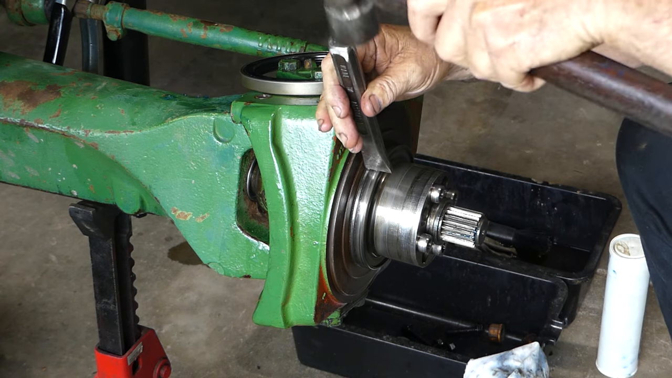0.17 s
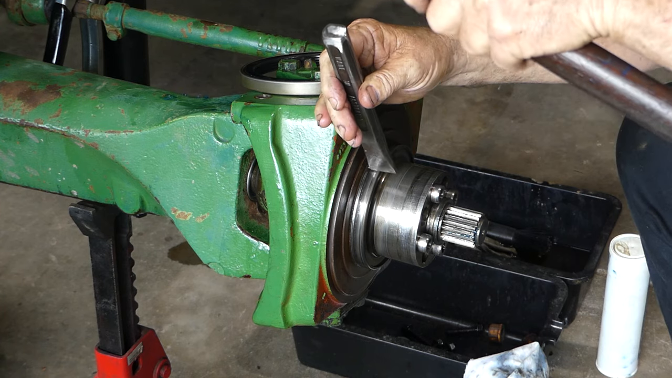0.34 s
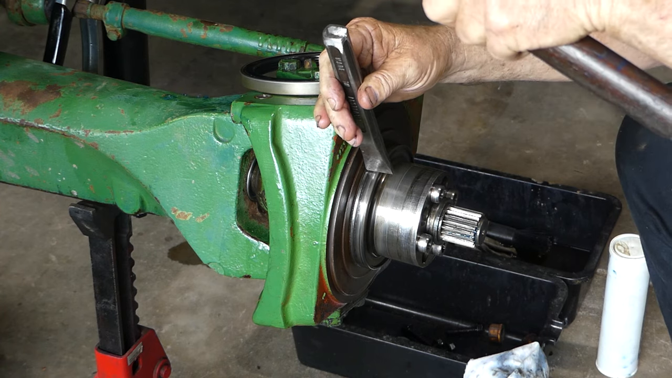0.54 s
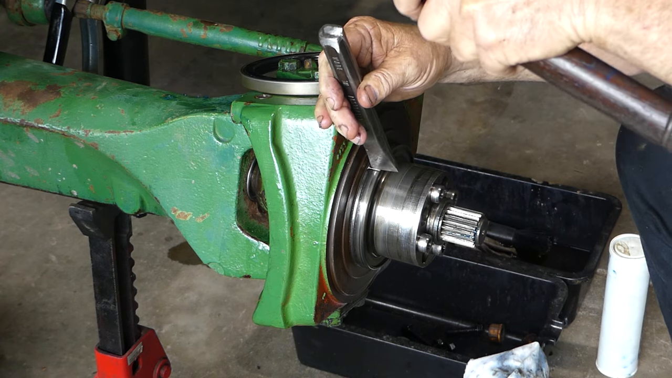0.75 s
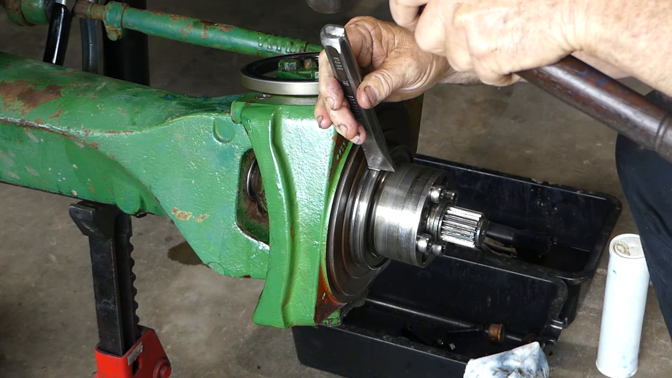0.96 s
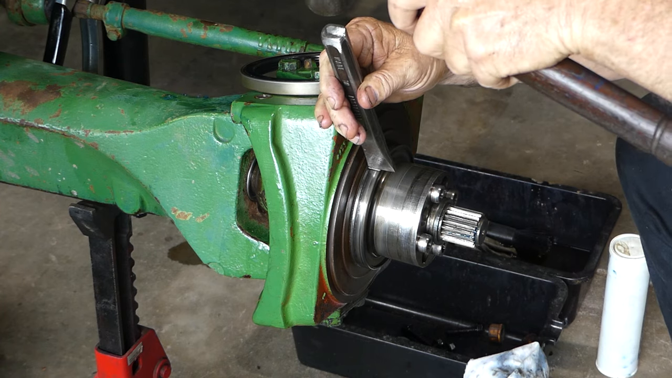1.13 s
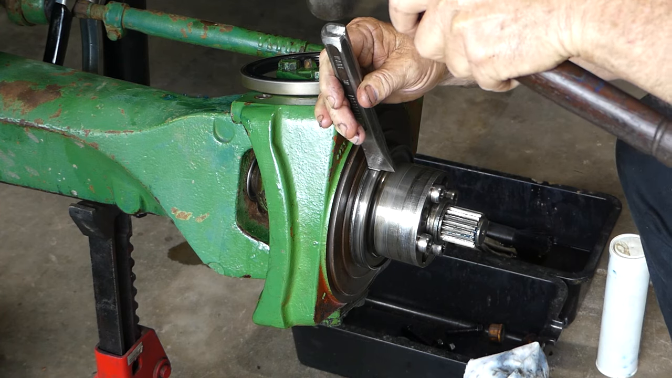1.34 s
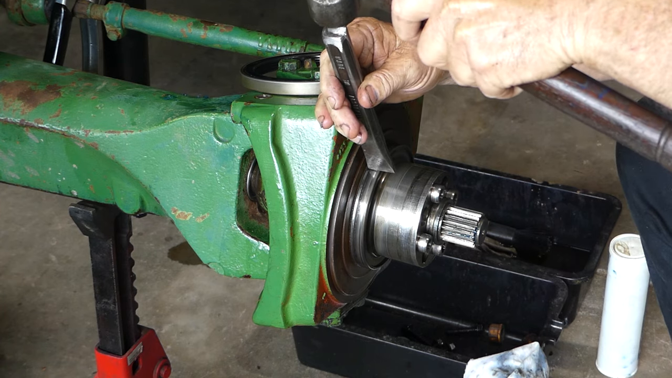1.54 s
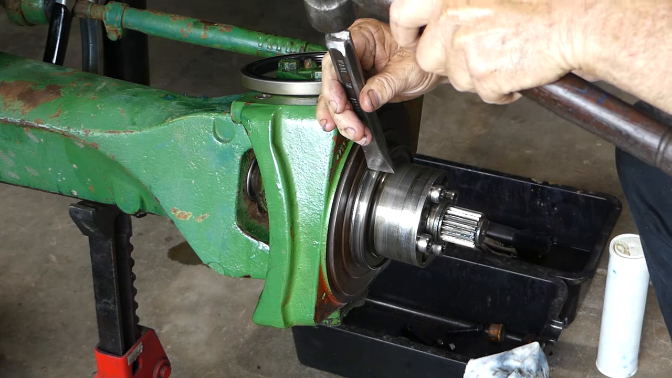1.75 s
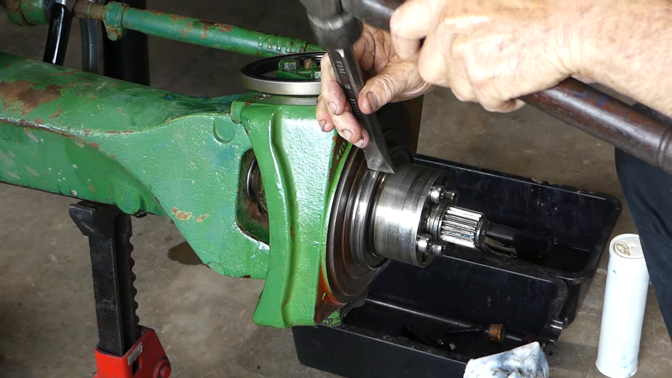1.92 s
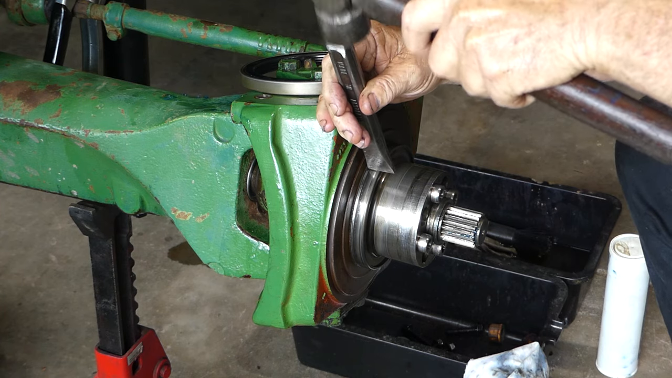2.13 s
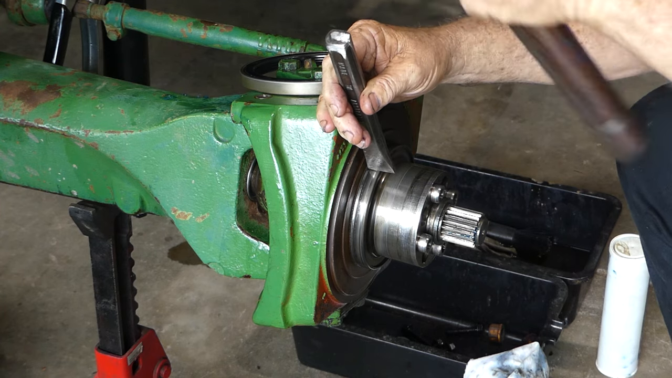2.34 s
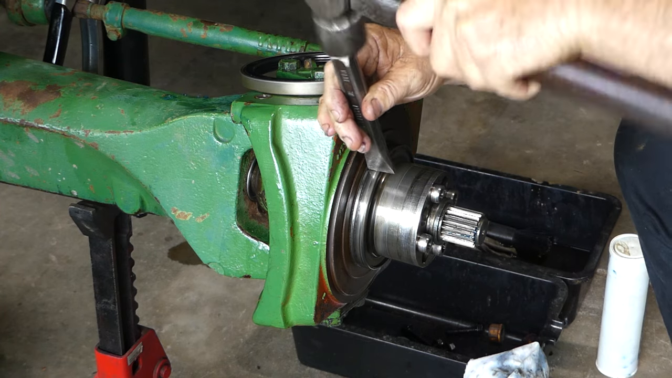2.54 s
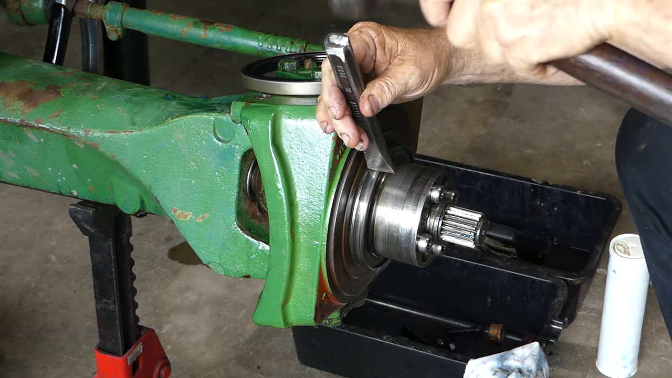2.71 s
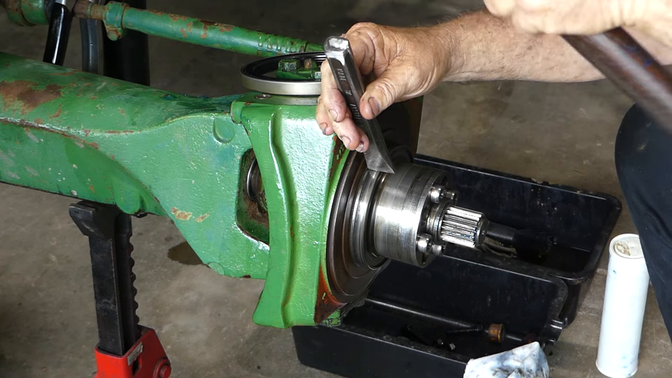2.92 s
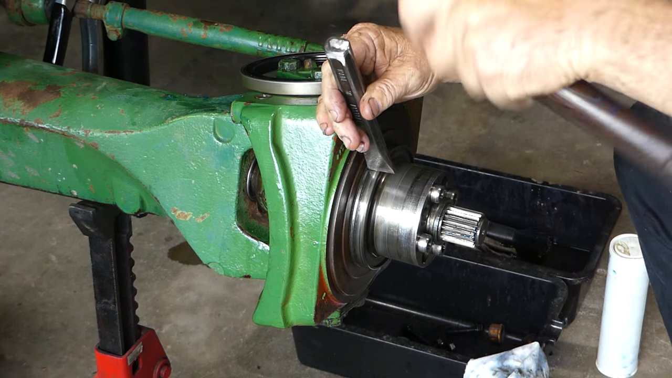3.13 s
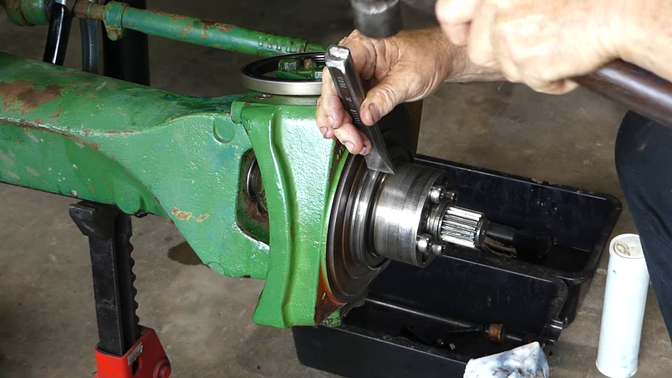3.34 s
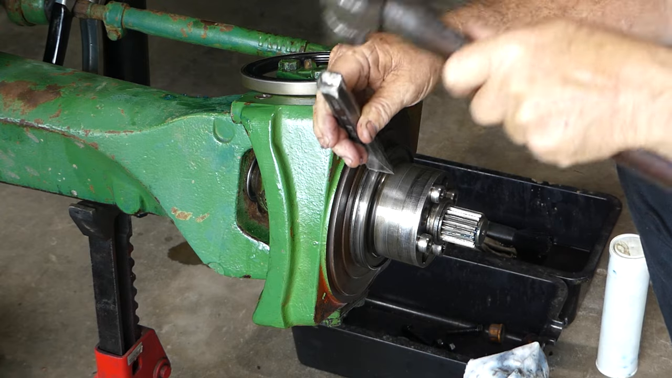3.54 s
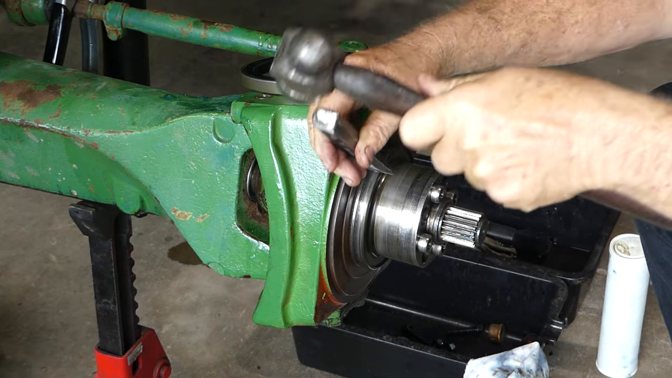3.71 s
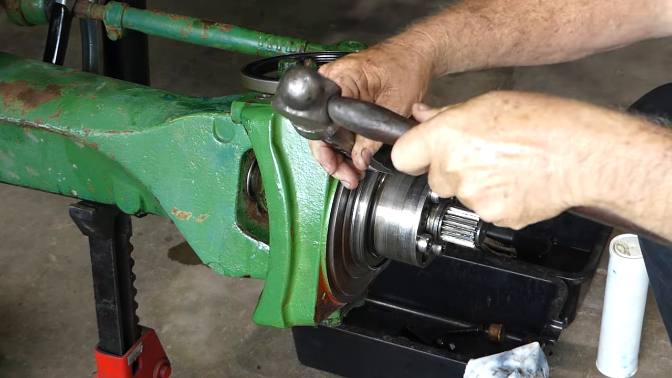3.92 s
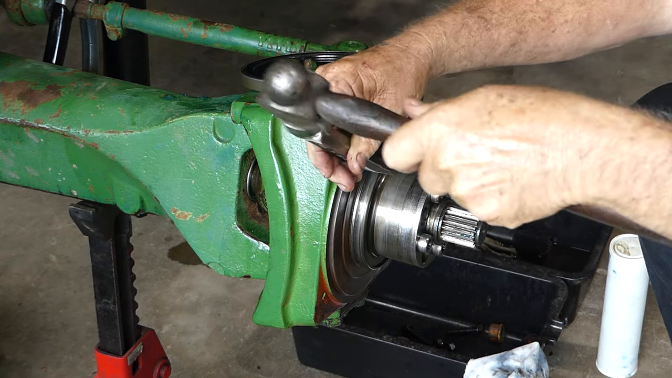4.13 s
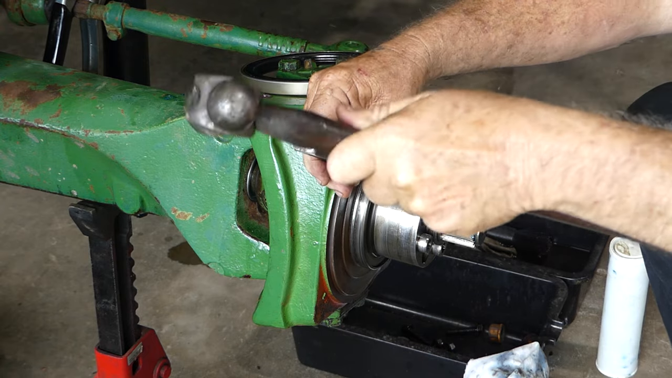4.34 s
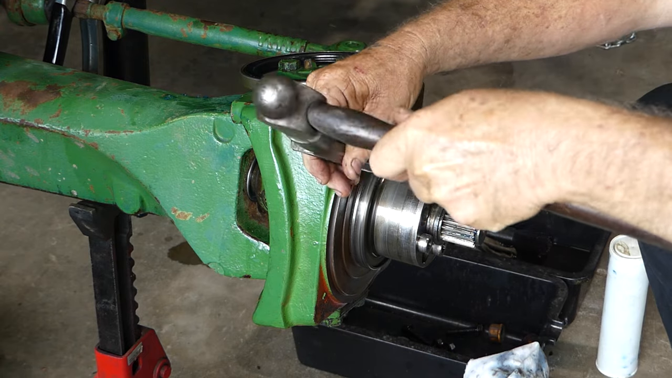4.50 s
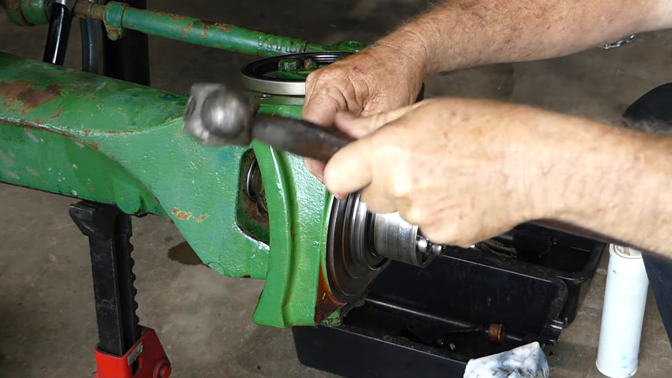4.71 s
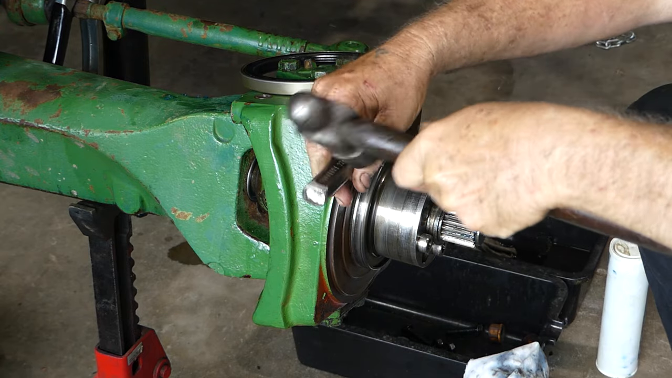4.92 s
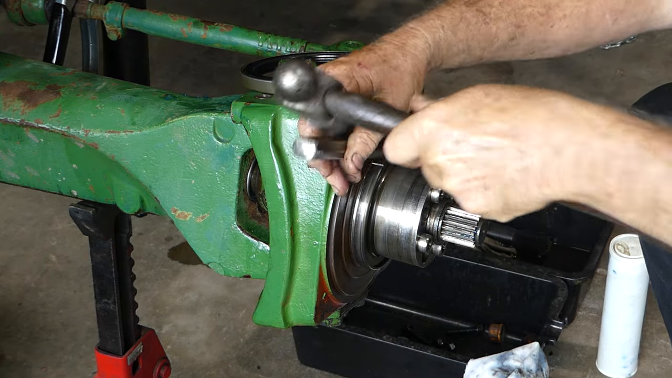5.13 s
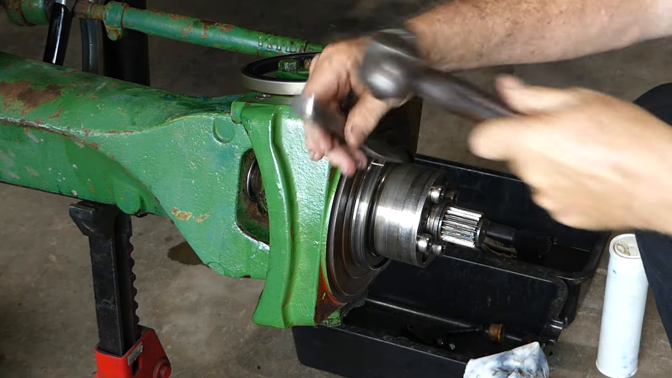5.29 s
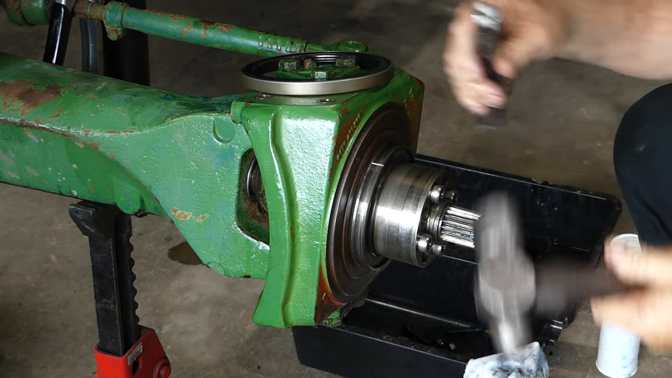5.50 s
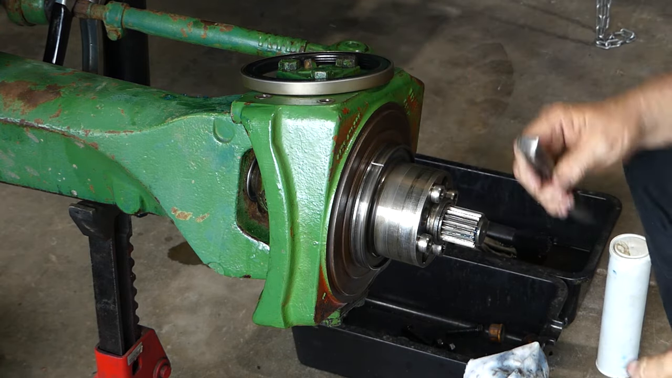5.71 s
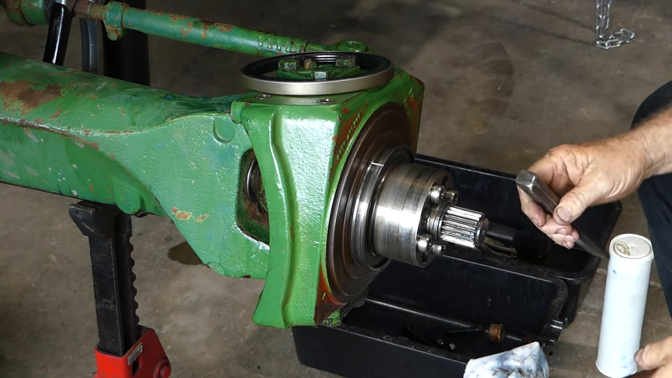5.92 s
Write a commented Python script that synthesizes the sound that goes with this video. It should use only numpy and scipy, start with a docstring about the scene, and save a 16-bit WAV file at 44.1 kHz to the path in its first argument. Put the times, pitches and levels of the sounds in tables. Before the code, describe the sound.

A hammer strikes a chisel against a heavy steel hub in sharp, ringing blows, with pauses and light taps, in a workshop.

```python
"""In a workshop, heard from one microphone position, a hammer drives a chisel against a cast axle's hub.
The first blow cracks, sets casting and room ringing and overloads the microphone; light taps then place
the hammer. Six more blows follow, weak and strong, the last three on the side of the hub, while the
hand-held chisel rings and chatters on its seat. At the end come a small click as the tools are lifted
and a faint swish of cloth as the arms draw back."""
import sys
import numpy as np
from scipy import signal
from scipy.fft import rfft, irfft
from scipy.io import wavfile
from scipy.ndimage import uniform_filter1d

SR = 44100
rng = np.random.default_rng(int(sys.argv[2]) if len(sys.argv) > 2 else 0)


def dump_mix(stems):
    """Bounce the given channels to the path in sys.argv[1] as a 16-bit WAV at rate SR."""
    frames = np.atleast_2d(stems).T  # one column per channel
    limited = np.clip(frames, -1, 1)  # hard clip at full scale
    pcm = np.round(limited * 32767).astype(np.int16)
    wavfile.write(sys.argv[1], SR, pcm)


N = 262647
TIME = np.arange(N) / SR
RING_SIZE = 81920
AGE, BINS = np.arange(RING_SIZE) / SR, np.fft.rfftfreq(RING_SIZE, 1 / SR)
# hammer blows: (time [s], force [dB], brightness [dB/octave], pitch the struck spot favours [Hz],
# chisel ring [dB], edgewise over flat bending [dB], pitch rise from the seat [Hz])
HAMMER_BLOWS = [(0.0238, -1.34, 1, 6370, -3, -11, 68), (2.0127, -20.5, -1.1, 3400, -4.5, -8.5, 340),
                (2.5871, 0, 0, 3480, -7.5, -1, 124), (3.208, -0.96, -0.52, 1590, -19.5, -12, 100),
                (3.9591, -19, -1.84, 2300, -15, -2, 370), (4.4716, -5.5, 0.42, 560, -12.5, 3.5, 560),
                (4.9207, -7.5, 0.1, 2640, 0, -3.5, 13)]


def clang(crack_t60=0.059, build_s=0.0013):
    """Countless close modes of casting and room: each blow gives a short crack, then a diffuse tail."""
    # dense ring of casting and room: (frequency [Hz], density [dB/Hz])
    body = [(25, -76.5), (55, -54), (85, -50.5), (280, -49), (550, -48.5), (1000, -50), (1650, -55.5),
            (1950, -55.5), (3300, -58), (4050, -58.5), (5200, -60), (7300, -62), (9000, -72), (12000, -79),
            (15000, -69.5)]
    # clusters of close modes in the hub: (centre [Hz], width [Hz], lift [dB])
    clusters = [(1680, 89, 4), (2300, 1100, 2), (3295, 370, 5), (3610, 300, 4), (4610, 90, 9),
                (5280, 37, 7.5), (5960, 250, 7.5), (9300, 200, 2.5)]
    # colour of the crack against the tail: (frequency [Hz], gain [dB])
    crack_colour = [(100, -4.5), (500, 3.5), (1200, 5), (2500, 8.5), (6000, 13.5), (14000, 9)]
    out = np.zeros(N)
    cluster_db = sum(db / (1 + (2 * (BINS - hz) / width) ** 2) for hz, width, db in clusters)
    body_db = at_hz(body, BINS) + cluster_db
    for blow in HAMMER_BLOWS:
        s, force_db = blow[:2]
        density_db = body_db + blow_level(blow, BINS)
        crack_db = 8 - 0.39 * force_db   # the crack stands out more in weak blows
        crack = irfft(noise_bins(density_db + at_hz(crack_colour, BINS) + crack_db))
        add(out, s, crack * fade(AGE, crack_t60) + room_tail(density_db, build_s))
    return out


def axle(gain_db=3, swell_s=0.00098, scatter_db=1.5):
    """The clear modes of the casting; every blow shares its force out a little differently."""
    # axle modes: (frequency [Hz], level [dB], t60 [s])
    modes = [(124, -39, .9), (278, -35, .9), (329, -41, 3.2), (338, -25, .7), (390, -33, .8),
             (453, -25, .9), (537, -27, .95), (614, -29, .5), (645, -26, .45), (682, -32, .8),
             (764, -28, .85), (872, -28, .95), (957, -37, 1.3), (1067, -37, 1.1), (1109, -30, 1.1),
             (1256, -33, .9), (1313, -30, .7), (1476, -30, .8), (1582, -21, .25), (1602, -28, .6),
             (1775, -28, .7), (2654, -30, .2), (3257, -31, .5), (3703, -32, .45)]
    out = np.zeros(N)
    for hz, level_db, t60 in modes:
        mode = ring(hz, t60)
        mode *= 1 - np.exp(-TIME[:len(mode)] / swell_s)   # the blow takes time to spread through the iron
        for blow in HAMMER_BLOWS:
            mode_db = gain_db + level_db + blow_level(blow, hz) + rng.normal(0, scatter_db)
            add(out, blow[0], mode * from_db(mode_db))
    return out


def blow_level(blow, hz, move_s=3.7, pivot_hz=2150, spot_lift_db=3.5, spot_octaves=0.17):
    """Level of a blow at a frequency: its force, the spot struck and a tilt from the contact time."""
    # the casting's answer on top of the hub, before move_s: (frequency [Hz], gain [dB])
    top_of_hub = [(50, 1), (300, 2), (1000, -1), (1600, 0), (2800, -3.5), (4800, 1), (7000, -1), (12000, 0)]
    # its answer at the side of the hub, afterwards: (frequency [Hz], gain [dB])
    side_of_hub = [(50, 1.5), (300, -1.5), (1000, -3.5), (2500, 3.5), (5000, -1.5), (12000, 3)]
    s, force_db, brightness, spot_hz = blow[:4]
    hz_above_bass = np.maximum(hz, 280)   # the tilt levels off in the bass
    tilt_db = brightness * np.log2(hz_above_bass / pivot_hz)
    spot_db = spot_lift_db * np.exp(-(np.log2(hz_above_bass / spot_hz) / spot_octaves) ** 2)
    return force_db + at_hz(top_of_hub if s < move_s else side_of_hub, hz) + tilt_db + spot_db


def chisel(seated_share=0.25, seat_damping_hz=43.7, choke_t60=0.12, tick_t60=0.019):
    """A steel bar ticks and rings; pressed on its seat, it bends at a higher pitch and stops sooner."""
    # chisel modes: (way of vibrating, frequency [Hz], level [dB], t60 [s])
    modes = [("flat", 2293, -1, .15), ("flat", 5832, 0, .13), ("flat", 10195, -12, .14),
             ("edge", 2937, 0, .17), ("edge", 7418, 0, .11), ("edge", 13360, -20, .12),
             ("length", 7924, -1, .25), ("length", 14135, -6, .2), ("length", 14915, -14, .12)]
    out, lowest_hz = np.zeros(N), modes[0][1]
    tick_band = signal.butter(2, [900, 6000], "band", fs=SR, output="sos")
    touches = sorted(contacts())
    next_times = [touch[0] for touch in touches[1:]] + [N / SR]
    for touch, next_s in zip(touches, next_times):
        s, ring_db, edgewise_db, lengthwise_db, hardness, tick_db, seat_hz = touch
        slant = np.arctan(from_db(edgewise_db))
        drive = {"flat": np.cos(slant), "edge": np.sin(slant), "length": from_db(lengthwise_db)}
        ring_share = seated_share + (1 - seated_share) * np.exp(-abs(seat_hz) / seat_damping_hz)
        for way, hz, level_db, t60 in modes:
            overtone_db = hardness * np.log2(hz / lowest_hz)   # hard contacts favour the overtones
            gain = drive[way] * from_db(ring_db + level_db + overtone_db)
            seat_feel = .75 if way == "length" else 1   # the seat damps lengthwise ring less than bending
            mode = ring(hz, t60 * ring_share ** seat_feel, seat_hz * (way == "flat"))
            since_next = np.maximum(TIME[:len(mode)] - (next_s - s), 0)
            choke = fade(since_next, choke_t60)   # the next contact stops what still rings
            add(out, s, gain * mode * choke * chatter(len(mode), seat_hz))
        tick = signal.sosfilt(tick_band, rng.standard_normal(RING_SIZE // 10))
        add(out, s, 2 * from_db(tick_db) * tick * fade(AGE[:len(tick)], tick_t60))
    return out


def contacts(blow_lengthwise_db=-13.5, tap_lengthwise_db=-15, tap_tick_db=-17):
    """Every blow and light tap, with the way it excites the chisel."""
    # the hammer settles on the chisel, or the chisel bounces on its seat: (time [s], ring [dB],
    # edgewise over flat bending [dB], hardness [dB/octave], pitch rise from the seat [Hz])
    taps = [(0.048, -2.5, -14, 0, 103), (0.4874, -33.5, -13, -13, 49), (0.801, -41.5, -16.5, -7.5, 50),
            (1.4342, -17.5, -28.5, -7.5, 55), (2.615, -13, -7.5, -1.5, 83), (3.2513, -11, -24, -4, 62),
            (4.946, -14, 6, 4, 2), (4.9799, -12.5, 8, 0.5, 6), (5.0038, -8.5, -27, -6, 9),
            (5.013, -14, -9, -1.5, 30), (5.0865, -15, -2, -4, 86)]
    for s, force_db, _, _, ring_db, edgewise_db, seat_hz in HAMMER_BLOWS:
        hardness = 3.5 + 0.36 * force_db   # stronger contacts are shorter, so brighter
        tick_db = -22 - 0.0012 * seat_hz   # slightly softer on a firm seat
        yield s, ring_db, edgewise_db, blow_lengthwise_db, hardness, tick_db, seat_hz
    for s, ring_db, edgewise_db, hardness, seat_hz in taps:
        yield s, ring_db, edgewise_db, tap_lengthwise_db, hardness, ring_db + tap_tick_db, seat_hz


def chatter(size, seat_hz, depth=.25, rate_hz=180, firm_seat_hz=60):
    """The blade buzzes against its seat, which roughens the ring; a free bar rings clean."""
    return 1 + depth * min(abs(seat_hz) / firm_seat_hz, 1) * flutter(size, rate_hz)


def small_click(gain_db=-8, rub_t60=0.02):
    """A brief dull knock as the tools are lifted away: a short rub excites damped modes."""
    # the knock: (time [s], level [dB])
    clicks = [(5.526, -31.5)]
    # its modes: (frequency [Hz], level [dB], t60 [s])
    modes = [(674, 3.5, 0.011), (1130, 6, 0.0088), (1714, 2.5, 0.012), (3750, -6, .006),
             (8350, -8.5, 0.006)]
    out, rub_size = np.zeros(N), RING_SIZE // 20
    for s, click_db in clicks:
        for hz, level_db, t60 in modes:
            rub = rng.standard_normal(rub_size) * fade(AGE[:rub_size], rub_t60)
            knock = signal.fftconvolve(rub / np.linalg.norm(rub), ring(hz, t60))
            add(out, s, from_db(click_db + level_db + gain_db) * knock)
    return out


def swish(whistle_db=-16, whistle_width_hz=120):
    """Sliding cloth: soft noise with a thin whistle that rises as the motion speeds up."""
    # colour of the cloth noise: (frequency [Hz], relative density [dB])
    cloth = [(35, -37.5), (60, 0), (153, -16), (354, -19), (398, -6), (527, -21), (803, -11.5),
             (1250, -15.5), (12400, -28.5), (16000, -35.5)]
    # swell of the motion: (time [s], level [dB])
    swell = [(5.55, -79), (5.7, -60.5), (5.82, -53.5), (5.95, -52)]
    # glide of the whistle: (time [s], pitch [Hz])
    glide = [(5.68, 10100), (5.80, 11470), (5.85, 12440), (5.95, 13100)]
    level = from_db(np.interp(TIME, *np.transpose(swell))) * (TIME > swell[0][0])
    pitch = np.interp(TIME, *np.transpose(glide))
    whistle = np.sin(2 * np.pi * np.cumsum(pitch) / SR) * flutter(N, whistle_width_hz)
    return level * (steady_noise(cloth) + from_db(whistle_db) * whistle)


def workshop(x, wet_db=-20):
    """Direct sound at the microphone plus the reverberation of the room."""
    response = room_tail(0, build_s=0.0049)
    return x + from_db(wet_db) * signal.fftconvolve(x, response / np.linalg.norm(response))[:N]


def room_tail(density_db, build_s):
    """Diffuse sound that builds up and then dies band by band, the treble first."""
    # decay of the workshop: (band centre [Hz], t60 [s])
    decays = [(80, 1.0), (300, 1.0), (1000, 1.0), (2500, 1.0), (5000, .93), (7000, .74), (8500, .6),
              (11000, .5), (13000, .39), (15000, .36)]
    bins, out = noise_bins(density_db), 0
    centres, t60s = np.transpose(decays)
    for share, t60 in zip(np.eye(len(centres)), t60s):
        band = at_hz(np.column_stack([centres, share]), BINS)
        out = out + irfft(bins * band) * fade(AGE, t60)
    return out * (1 - np.exp(-AGE / build_s))


def room_tone(level_db=-56):
    """A faint, steady, low noise behind the work."""
    # colour of the background: (frequency [Hz], relative density [dB])
    spectrum = [(15, -54.5), (25, -3.5), (170, -9.5), (270, -7), (301, -13.5), (326, -7.5), (363, -18.5),
                (476, -13), (1040, -21.5), (1370, -21), (1560, -28), (5280, -32.5), (16000, -53.5)]
    return from_db(level_db) * steady_noise(spectrum)


def ring(hz, t60, rise_hz=0, settle_s=0.0022):
    """One struck mode, of height 1; its pitch may rise as the contact tightens."""
    age = TIME[:int(1.5 * t60 * SR)]
    pitch = hz + rise_hz * (1 - np.exp(-age / settle_s))
    return np.sin(2 * np.pi * np.cumsum(pitch) / SR) * fade(age, t60) * rng.choice([-1, 1])


def flutter(size, rate_hz):
    """Random wavering of rms 1, mostly slower than rate_hz."""
    x = signal.sosfilt(signal.butter(2, rate_hz, fs=SR, output="sos"), rng.standard_normal(size))
    return x / x.std()


def noise_bins(density_db):
    """Spectrum of a noise with the given level per Hz."""
    return rfft(rng.standard_normal(RING_SIZE)) * from_db(density_db) * np.sqrt(SR / 2)


def steady_noise(spectrum):
    """Coloured noise of rms 1."""
    hz = np.fft.rfftfreq(N, 1 / SR)
    x = irfft(rfft(rng.standard_normal(N)) * from_db(at_hz(spectrum, hz)), N)
    return x / x.std()


def from_db(db):
    """Decibels to gain."""
    return 10 ** (np.asarray(db) / 20)


def at_hz(points, hz):
    """Read a table on a log-frequency axis."""
    f, value = np.transpose(points)
    return np.interp(np.log(np.maximum(hz, 1)), np.log(f), value)


def fade(age, t60):
    """Exponential decay, 60 dB down after t60."""
    return np.exp(-np.log(1000) * age / t60)


def add(track, s, sound):
    """Mix a sound in at a time."""
    start = max(round(s * SR), 0)
    track[start:start + len(sound)] += sound[:N - start]


def scene():
    """All sources reach one microphone position, alike in both channels."""
    background = room_tone()
    sound = clang() + axle() + workshop(chisel() + small_click()) + swish() + background
    return np.array([sound, sound])


def held_level(x, window_s=.003, release_s=.08):
    """Level detector that looks slightly ahead and lets go exponentially."""
    log_rms = np.log(np.abs(uniform_filter1d(x * x, int(window_s * SR))) + 1e-12) / 2
    return np.exp(np.maximum.accumulate(log_rms + TIME / release_s) - TIME / release_s)


def record(dry, drive_db=-1.0, right_db=-1.5, squeeze_db=8.7, stopband_hz=16600):
    """The microphone overloads; gain control ducks the right channel after each peak; the top is cut."""
    x = dry * from_db(drive_db)
    left, right = x / (1 + x ** 4) ** (1 / 4)   # soft clipping
    right = right * from_db(right_db - squeeze_db * held_level(right))
    low_pass = signal.cheby2(16, 60, stopband_hz, fs=SR, output="sos")
    return np.clip(signal.sosfilt(low_pass, [left, right]), -1, 1)


dry = scene()
out = record(dry)
dump_mix(out)
```